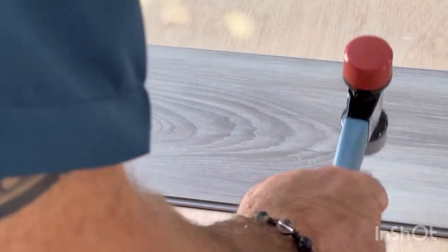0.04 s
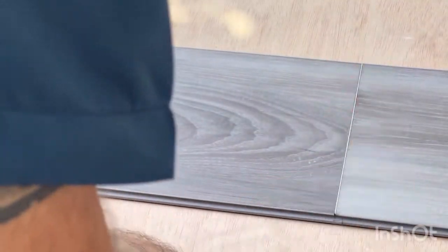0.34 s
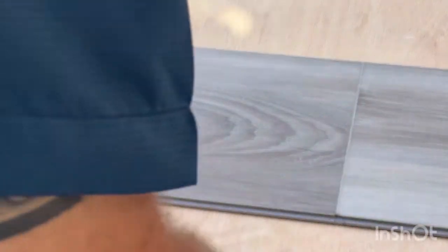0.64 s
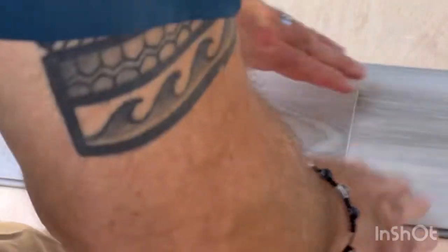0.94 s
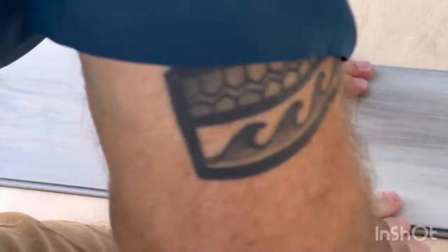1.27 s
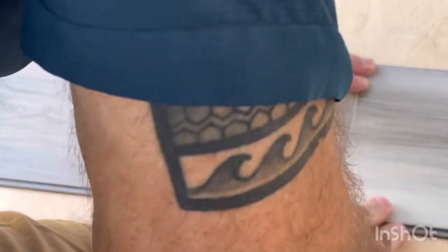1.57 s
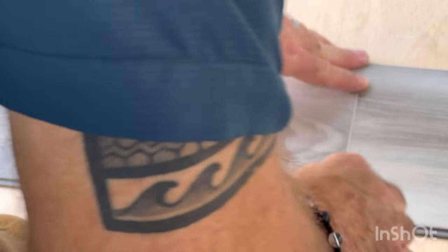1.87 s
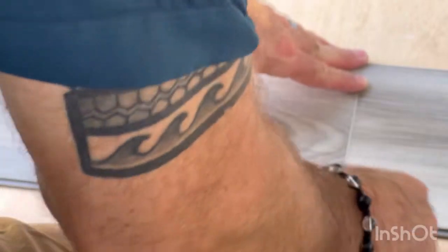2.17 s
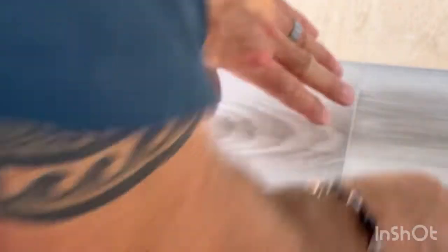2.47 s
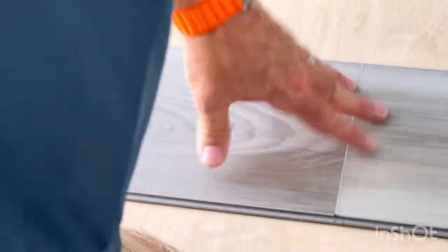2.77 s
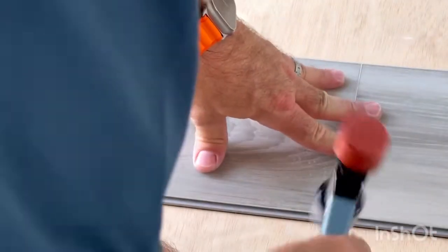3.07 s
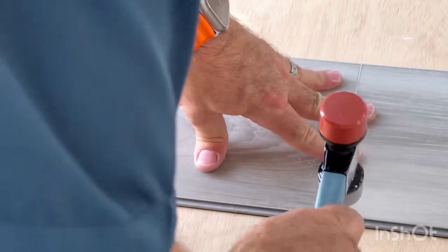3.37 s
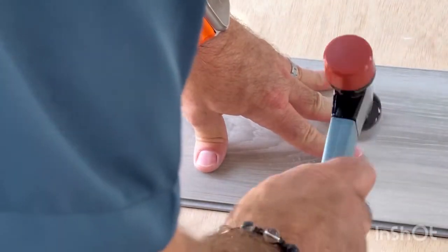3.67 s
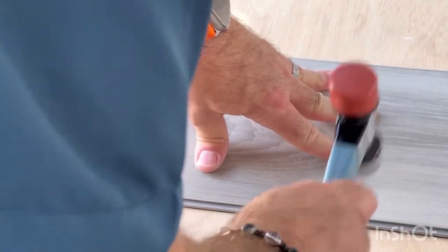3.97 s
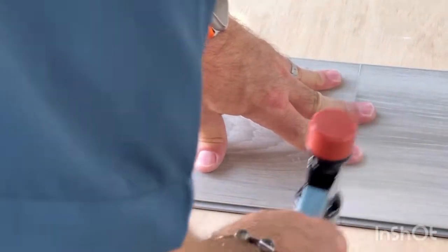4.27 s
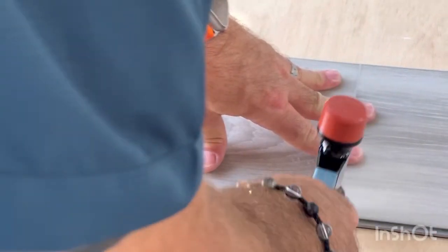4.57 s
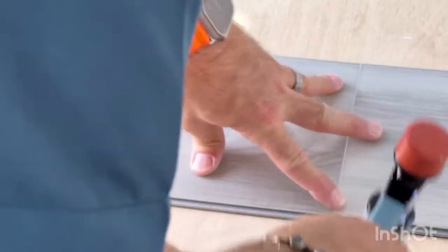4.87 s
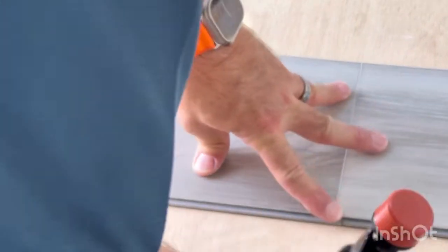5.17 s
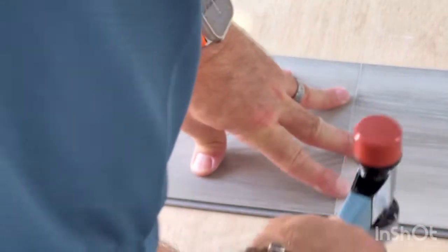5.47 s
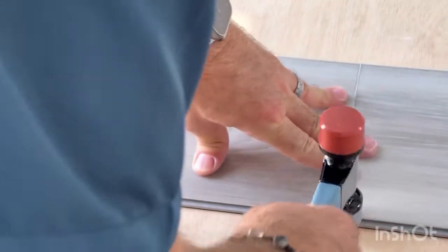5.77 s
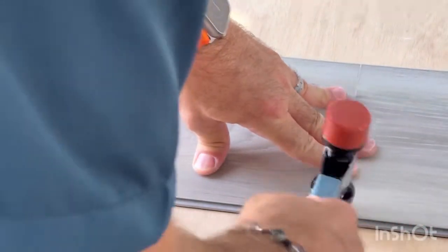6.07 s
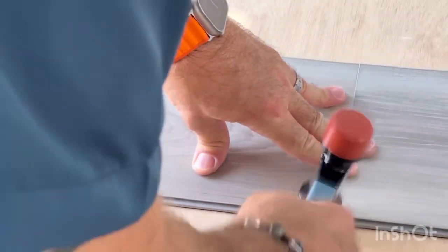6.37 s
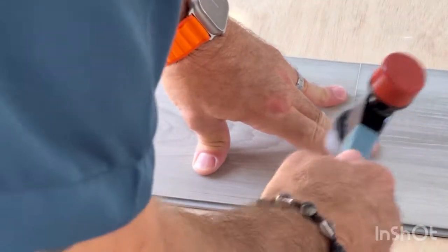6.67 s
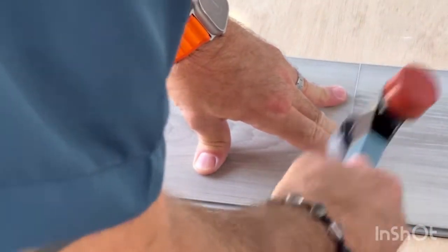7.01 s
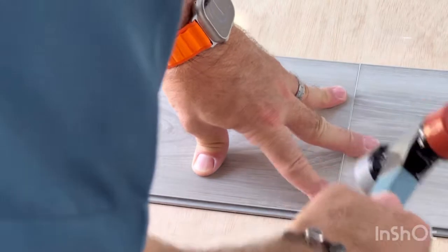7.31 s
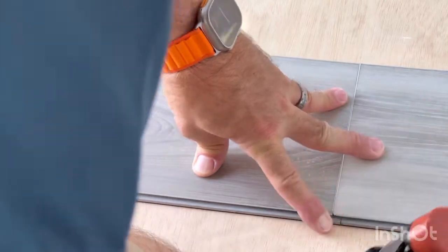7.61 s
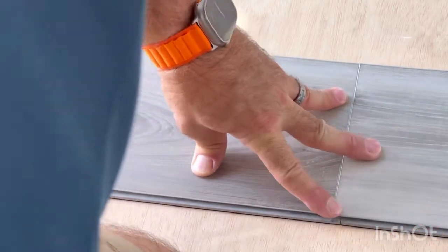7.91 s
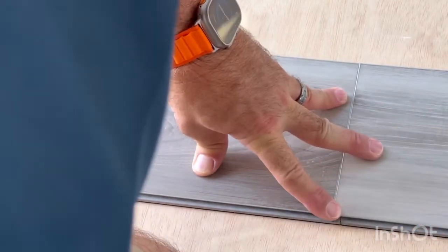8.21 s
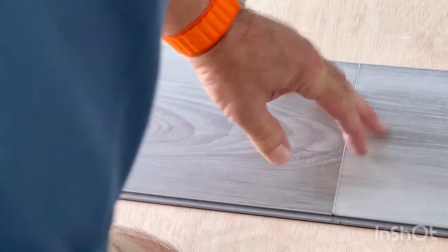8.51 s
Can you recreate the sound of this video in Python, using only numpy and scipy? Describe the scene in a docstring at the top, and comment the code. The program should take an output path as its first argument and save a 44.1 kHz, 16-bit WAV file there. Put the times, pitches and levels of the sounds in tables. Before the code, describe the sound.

Close up inside a van, the floor rings low over a faint, steady traffic rumble. At about 0.5 seconds a small mallet lands with a boom and a clack, bounces and rocks to rest by 1 second. A car passes quietly outside, nearest around 1.4 seconds. From 1 to 3 seconds a sleeve and hands brush a vinyl plank, with soft thuds of shifting weight. From 3.4 to 4.5 seconds come four loud mallet blows, about three a second, the last with a quick rebound. Each booms through floor and cabin, with a slap of plank on plywood and a small crack from the joint. Hands rub faintly. A light tap at 5.7 seconds starts a second run, with four firm blows from 6 to 7 seconds. More faint rubbing follows, and at 8.5 seconds the mallet is put down with a thud and clatter.

```python
"""A vinyl plank is seated on the plywood floor of a van, close by, over a faint rumble of traffic.
The floor rings low at the start; a small mallet lands with a boom, bounces and rocks to rest.
A car passes outside while a sleeve and hands brush the plank and shifting weight thuds softly.
Two runs of mallet blows follow: floor and cabin boom, the plank slaps the plywood and its joint cracks.
Hands rub it between and after the runs, and at last the mallet is put down again."""
import sys
import numpy as np
from scipy import signal
from scipy.fft import rfft, irfft, next_fast_len
from scipy.io import wavfile
from scipy.ndimage import uniform_filter1d

SR = 44100
rng = np.random.default_rng(int(sys.argv[2]) if len(sys.argv) > 2 else 0)


def digitize_waveform(pressure):
    """Quantize a signal to 16-bit integers and store it at the path in sys.argv[1].

    Rows of a 2-D input are taken as channels; values are limited to [-1, 1].
    """
    field = np.atleast_2d(pressure).T
    bounded = np.clip(field, -1, 1)
    quanta = np.round(bounded * 32767).astype(np.int16)
    wavfile.write(sys.argv[1], SR, quanta)


N = 381465
AGE = np.arange(2 ** 16) / SR  # seconds since a sound began

# Modes of plank, floor and cabin together. Each row: frequency in Hz, level in dB, t60 in seconds.
VAN_MODES = [(40, -18.5, 0.494), (51.8, -29.5, 2.4), (60.4, -34.5, 0.826), (68.3, -19.5, 1),
             (76.7, -17, 0.69), (87.3, -30, 0.72), (97.8, -24.5, 1.2), (120, -43, 1.583),
             (109.48, -13.5, 0.55), (128.8, 0.5, 0.133), (125.36, -10, 0.412), (149, -37, 1.7),
             (165, 1.5, 0.083), (184.1, -13.5, 0.4), (204.6, -11, 0.215), (274.5, -39, 0.14),
             (235.4, -21.5, 0.27), (274.5, -23, 0.276), (320.6, -13, 0.144), (349, -32, 0.151),
             (369.8, -19, 0.178), (406, -26.5, 0.23), (432.3, -18, 0.13), (468, -17, 0.127),
             (563, -32.5, 0.114)]
# Low floor booms: the floor ringing at the start, booming as the mallet lands, and soft thuds of
# shifting weight. Each row: start in seconds, level in dB, cut-off in Hz.
FLOOR_BOOMS = [(0.0, -14.5, 55), (0.48, -8, 49.93), (1.621, -31, 203.7), (2.72, -30.5, 200),
               (3.06, -28, 110.7), (8.25, -32.5, 70.1), (8.53, -12, 55)]
# Spectra of a car and of far traffic. Each row: frequency in Hz, spectral density in dB.
ROAD_SPECTRUM = [(60, -23), (90, -10.5), (150, -9), (215, -1.5), (350, -17.5), (810, -25.5), (1200, -31),
                 (2300, -29), (3200, -33), (4600, -38.5), (6900, -31.5), (8700, -38.5), (12000, -34),
                 (15500, -47)]
RUMBLE_SPECTRUM = [(22, -22.5), (35, -10.5), (55, 0), (80, -10), (115, -3), (215, -26), (330, -27.5),
                   (480, -30), (800, -35), (1200, -41), (4000, -56.5), (15500, -70.5)]
# The mallet put down and nudged. Each row: start in seconds, floor thud in dB, knock in dB,
# contact cut-off in Hz, clack in dB.
MALLET_LANDINGS = [(0.4238, -11, -22, 520, -55), (0.4806, -5, -7, 9000, -7.5),
                   (0.56, -15, 2.5, 4990, -14.5), (0.9545, -44, -41, 895, -39),
                   (8.4868, -12, -9.5, 1810, -17.5), (8.5290, -7.5, -17, 6950, -7),
                   (8.6253, -22, -18.5, 1360, -21)]
# Modes of the loose mallet on the plank. Each row: frequency in Hz, level in dB, t60 in seconds.
MALLET_MODES = [(173, -30.5, 0.22), (304, -23.5, 0.065), (393, -7.5, 0.03), (539, 1, 0.035),
                (550.5, -8, 0.064), (722, -24.5, 0.12), (1001, -1.5, 0.025), (1010.6, -21.5, .12),
                (1270, -28, .14), (1290, 2.5, .004), (1715, -20.5, 0.028), (2320, -11, 0.015),
                (2320, -28.5, 0.053), (2570, -31, 0.05), (3230, -21.5, 0.018), (1495, -27, .09),
                (266.6, -24, .28), (479, -16, 0.1), (1780, -27, 0.077), (2230, -30, 0.055)]
# Impact spectra of plank, mallet and joint. Each row: frequency in Hz, spectral density in dB.
SLAP_SPECTRUM = [(350, -18.5), (520, 7.5), (760, 1), (1050, -3), (1240, -9.5), (1450, -5), (1750, -12),
                 (2100, -13.5), (3000, -24), (5000, -42.5), (9000, -72.5)]
CLACK_SPECTRUM = [(300, -14), (700, 2.5), (1050, -4.5), (1500, 2.5), (2500, -0.5), (3400, -2.5),
                  (4500, -12), (5500, -8.5), (7000, -12), (9000, -20), (12300, -26.5), (15500, -42)]
CRACK_SPECTRUM = [(1200, -19), (2000, 6.5), (3000, 2.5), (4200, -1), (6500, -3.5), (8500, -6),
                  (12000, -8.5), (15500, -10)]
# A hand on the plank. Each row: start in seconds, length in seconds, rub in dB, bright scuff in dB.
HAND_STROKES = [(1.626, 0.012, -46, -58), (2.31, 0.046, -62.5, -59.5), (2.619, 0.082, -54, -59),
                (2.714, 0.054, -55, -63), (3.056, 0.044, -57.5, -73), (4.627, .1, -72, -65),
                (4.831, .04, -69, -69), (4.946, .041, -66.5, -71.5), (5.185, 0.052, -66, -65.5),
                (7.513, 0.039, -58, -61.5), (8.251, 0.05, -66, -64.5), (8.361, 0.064, -70, -66.5)]
# Spectrum of a rub. Each row: multiple of its pitch, spectral density in dB.
RUB_SPECTRUM = [(.25, -10), (0.649, 2), (1, 13), (1.5, -6), (2.999, -5.5), (8, -32.5)]
# Spectrum of a scuff. Each row: frequency in Hz, spectral density in dB.
SCUFF_SPECTRUM = [(800, -10), (2500, 0), (4500, -4.5), (7500, -3.5), (12000, -1.5), (15500, -21)]
# Seating blows. Each row: start in seconds, force in dB, hollow ring in dB, flatness in dB.
# A flat hit slaps more; an edge hit cracks more.
BLOWS = [(3.4319, -9, -14.5, -1), (3.7490, -3, -6, -1), (4.1004, -1, -7, 0), (4.4706, -0.5, -4, 0),
         (4.5035, -11, 5, 9), (5.709, -14.5, -9, 0.5), (6.0359, 0.5, -6.5, -1), (6.352, -1.5, -18, -4),
         (6.7191, -1.5, -15, 2), (7.0290, -1.7, -15, 1)]
# Bending modes of the plank alone. Each row: frequency in Hz, level in dB, t60 in seconds.
BENDING_MODES = [(608, -5, 0.073), (698, -3.5, 0.097), (768.5, -8, 0.082), (840, -14.5, 0.13),
                 (902, -8.5, 0.084), (892, 2.5, 0.038), (997, -14, 0.09), (1097, -14.5, 0.074),
                 (1336, -3.5, 0.045), (1453, -8.5, 0.048), (1529, -6.5, 0.04), (1608, -24, 0.13),
                 (1917, -12.5, 0.033), (2137, -15, 0.036), (2450, -20, 0.048), (3570, -16, 0.026)]
# Dips of the microphone ports. Each row: centre in Hz, width in Hz.
PORT_NOTCHES = [(10200, 4000), (13900, 1800)]


def undb(db):
    """Amplitude ratio of a level in dB."""
    return 10 ** (np.asarray(db) / 20)


def fade(t60):
    """Damping: exponential decay by 60 dB in t60 seconds."""
    return np.exp(-np.log(1000) * AGE / t60)


def cut(x, hz, kind="low", order=2):
    """Butterworth low- or high-pass."""
    return signal.sosfilt(signal.butter(order, min(hz, SR / 2 - 1000), kind, fs=SR, output="sos"), x)


def noise(spectrum, size):
    """Random phases under a given spectrum sum to noise, here of rms 1."""
    hz, db = np.transpose(spectrum)
    bins_hz = np.maximum(np.arange(size // 2 + 1) * SR / size, 1)
    magnitude = undb(np.interp(np.log(bins_hz), np.log(hz), db))
    x = irfft(magnitude * np.exp(2j * np.pi * rng.random(len(bins_hz))), size)
    return x / x.std()


def diffuse(spectrum, size, side_db):
    """A diffuse field: stereo noise whose long waves are alike on both sides."""
    side = cut(noise(spectrum, size), 300, "high", order=1)
    return noise(spectrum, size) + undb(side_db) * side * np.array([[1], [-1]])


def waver(rate_hz):
    """Slow modulation: random steps, smoothed twice, with a spread near 1."""
    hold = int(SR / rate_hz)
    steps = np.repeat(rng.standard_normal(N // hold + 1), hold)
    return 1.3 * uniform_filter1d(uniform_filter1d(steps, hold), hold)[:N]


def add(out, start_s, sound):
    """Superposition: a sound adds to those already present."""
    i = int(start_s * SR)
    out[:, i:i + sound.shape[-1]] += sound[..., :N - i]


def ring(modes, swell_cycles, side_db):
    """Damped modes of alternating sign build up as the wave spreads, out of phase left and right."""
    out = 0
    for k, (hz, db, t60) in enumerate(modes):
        lead = undb(side_db) * min(hz / 500, 1) * (-1) ** (k // 2) * np.array([[1], [-1]])
        swell = 1 - np.exp(-AGE * hz / swell_cycles)
        out = out + (-1) ** k * undb(db) * np.sin(2 * np.pi * hz * AGE + lead) * swell * fade(t60)
    return out


def burst(spectrum, direct_t60, cabin_db, cabin_t60, side_db):
    """Dense, heavily damped modes merge into noise: direct sound, then the cabin's reverberation."""
    direct = noise(spectrum, len(AGE)) * fade(direct_t60) * (1 - np.exp(-AGE / 0.0001))
    cabin = diffuse(spectrum, len(AGE), side_db) * fade(cabin_t60) * (1 - np.exp(-AGE / 0.0058))
    return direct + undb(cabin_db) * cabin


def floor_booms():
    """Free vibration of the floor's lowest modes is heard as booms and soft thuds."""
    out = np.zeros((2, N))
    floor = ring(VAN_MODES, swell_cycles=2.2, side_db=-11.5)
    for start, db, cutoff_hz in FLOOR_BOOMS:
        add(out, start, undb(db) * cut(floor, cutoff_hz))
    return out


def far_traffic():
    """Distant vehicles merge into a steady, diffuse rumble."""
    return undb(-49.5) * diffuse(RUMBLE_SPECTRUM, N, side_db=-5.5)


def passing_car(nearest_s=1.42, nearest_m=8.2, speed_m_s=12, shadow_ends_s=0.88, waver_db=2.4):
    """Spherical spreading sets the level; hiss fades faster, and the van shadows it on the approach."""
    t = np.arange(N) / SR
    spreading_db = 20 * np.log10(nearest_m / np.hypot(nearest_m, speed_m_s * (t - nearest_s)))
    shadow = 0.5 - 0.5 * np.tanh((t - shadow_ends_s) / 0.12)
    hiss_db = -2.5 + 0.5 * spreading_db - 9 * shadow
    road = diffuse(ROAD_SPECTRUM, N, side_db=-7)
    roar = cut(cut(road, 2200)[:, ::-1], 3400)[:, ::-1]  # forwards and backwards, so the rest is hiss
    hiss = undb(hiss_db + waver_db * waver(14)) * (road - roar)
    return undb(-45 + spreading_db) * (undb(waver_db * waver(7.1)) * roar + hiss)


def slap():
    """The plank's impact on the plywood radiates a short midrange burst."""
    return burst(SLAP_SPECTRUM, direct_t60=0.022, cabin_db=-9.5, cabin_t60=0.18, side_db=-7.5)


def mallet_bounces():
    """The loose mallet knocks, clacks and rings the floor's upper modes; shorter contact is brighter."""
    out = np.zeros((2, N))
    floor = cut(ring(VAN_MODES, swell_cycles=1, side_db=-13), 190, "high") * fade(0.9)
    knock = ring(MALLET_MODES, swell_cycles=1, side_db=-12) + undb(-17) * slap()
    for start, thud_db, knock_db, contact_hz, clack_db in MALLET_LANDINGS + rocking():
        clack = burst(CLACK_SPECTRUM, direct_t60=0.023, cabin_db=-13, cabin_t60=0.16, side_db=-9.5)
        add(out, start, cut(undb(thud_db) * floor + undb(knock_db) * knock, contact_hz))
        add(out, start, undb(clack_db) * cut(clack, 2 * contact_hz))
    return out


def rocking(start=0.668, first_flight_s=0.0596, restitution=0.6, count=5):
    """Each inelastic bounce keeps a share of its speed, so landings come sooner, softer and duller."""
    landings = []
    for speed in restitution ** np.arange(count):
        speed_db = 20 * np.log10(speed)
        thud_db, knock_db, clack_db = -17 + speed_db, 1.16 * speed_db, -17.5 + 2 * speed_db
        contact_hz = 4000 * speed ** 0.72
        landings.append((start, thud_db, knock_db, contact_hz, clack_db))
        start += first_flight_s * speed
    return landings


def sleeve_strokes(from_s=0.98, to_s=3.2, mean_length_s=0.091, rub_db=-74.5, count=8):
    """Friction of the sleeve comes in uneven strokes, whose scuff fades as the arm comes to rest."""
    strokes = []
    for k, (late, stretch) in enumerate(rng.random((count, 2))):
        elapsed = (k + late) / count * (to_s - from_s)
        scuff_db = -62 - 4.5 * elapsed
        strokes.append((from_s + elapsed, mean_length_s * (0.5 + stretch), rub_db, scuff_db))
    return strokes


def rubbing(middling_db=-57.5, middling_hz=1025, db_per_octave=12.5, grain_db=2.8):
    """Stick-slip friction of skin and cloth makes grainy noise; a firmer rub has a lower pitch."""
    out = np.zeros((2, N))
    age = AGE[:2 ** 14]
    for start, length, rub_db, scuff_db in HAND_STROKES + sleeve_strokes():
        pitch_hz = middling_hz * 2 ** ((middling_db - rub_db) / db_per_octave)
        stroke = 3 * age / length * np.exp(1 - 3 * age / length)
        catches = np.repeat(rng.standard_normal(len(age)), 90)[:len(age)]  # a new grip every 2 ms
        rub = diffuse(np.array(RUB_SPECTRUM) * [pitch_hz, 1], len(age), side_db=-8)
        scuff = diffuse(SCUFF_SPECTRUM, len(age), side_db=-23.5)
        add(out, start, stroke * undb(grain_db * catches) * (undb(rub_db) * rub + undb(scuff_db) * scuff))
    return out


def seating_blows(stiffening_db_per_octave=6.5, hop_s=0.0063, hop_db=-4):
    """Rubber stiffens under load, so a harder blow is brighter; slap and crack outgrow the boom."""
    out = np.zeros((2, N))
    floor = ring(VAN_MODES, swell_cycles=0.81, side_db=-7.5)
    # Where the plank lies hollow, the modes above 295 Hz answer at once and louder.
    hollow = ring([mode for mode in VAN_MODES if mode[0] > 295], swell_cycles=0.13, side_db=-18.5)
    plank = ring(BENDING_MODES, swell_cycles=6.2, side_db=-8.5) + undb(-5.5) * slap()
    for start, force_db, hollow_db, flat_db in BLOWS:
        travel_db = force_db + 0.27 * hollow_db  # a hollow spot gives way further
        contact_hz = 1300 * 2 ** (travel_db / stiffening_db_per_octave)
        slap_db = -14 + 2.03 * force_db + flat_db
        crack_db = -25.5 + 1.98 * travel_db - flat_db
        add(out, start, undb(force_db) * cut(floor + undb(hollow_db) * hollow, contact_hz))
        add(out, start, undb(slap_db) * (plank + undb(-4.5) * slap()))
        add(out, start, undb(crack_db) * crack())
        add(out, start + hop_s, undb(crack_db + hop_db) * crack())  # the plank hops and lands again
    return out


def crack():
    """The interlocking joint snaps; so brief an impulse reaches far into the treble."""
    return burst(CRACK_SPECTRUM, direct_t60=0.018, cabin_db=-8.5, cabin_t60=0.15, side_db=-19)


def scene():
    """Sound pressures from inside and outside the van add linearly."""
    return seating_blows() + mallet_bounces() + floor_booms() + rubbing() + passing_car() + far_traffic()


def record(dry, right_lag_s=1.3e-5, ceiling=0.95, top_hz=16000):
    """Two close microphone ports notch the treble; saturation rounds the peaks; a low-pass cuts the top."""
    size = next_fast_len(N + SR)
    delay = np.exp(-2j * np.pi * right_lag_s * np.arange(size // 2 + 1) * SR / size)
    ports = np.array([dry[0], irfft(rfft(dry[1], size) * delay, size)[:N]])
    for hz, width_hz in PORT_NOTCHES:
        ports = signal.lfilter(*signal.iirnotch(hz, hz / width_hz, fs=SR), ports)
    rounded = ports / (1 + (ports / ceiling) ** 6) ** (1 / 6)
    return signal.sosfilt(signal.ellip(8, 0.2, 70, top_hz, fs=SR, output="sos"), rounded)


dry = scene()
out = record(dry)
digitize_waveform(out)
```